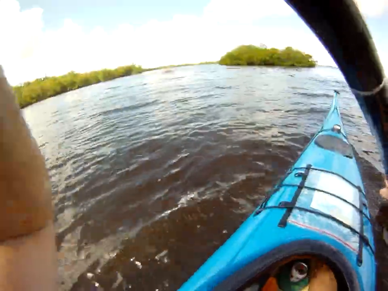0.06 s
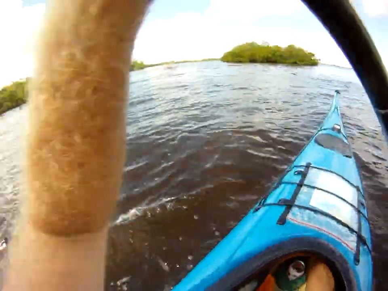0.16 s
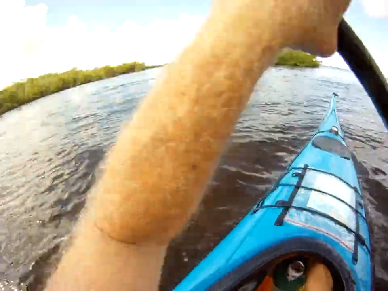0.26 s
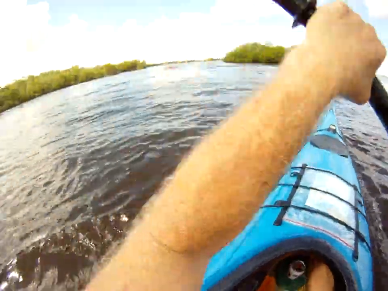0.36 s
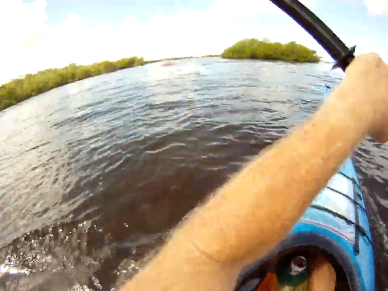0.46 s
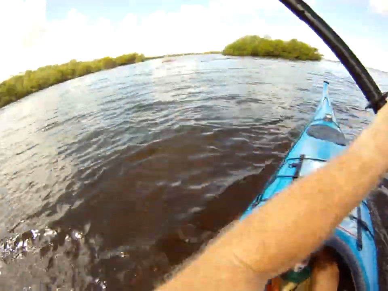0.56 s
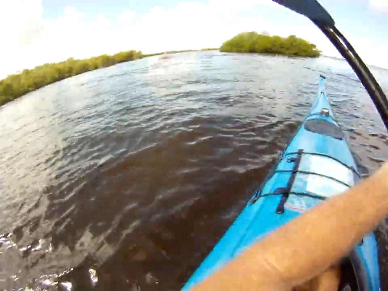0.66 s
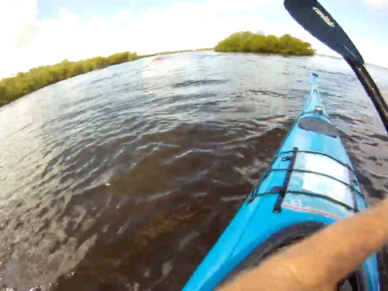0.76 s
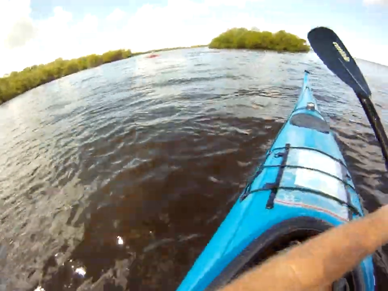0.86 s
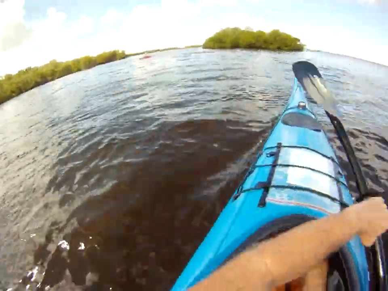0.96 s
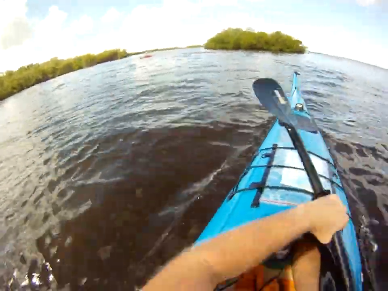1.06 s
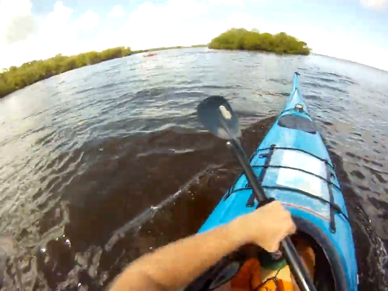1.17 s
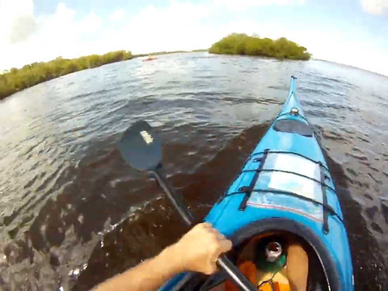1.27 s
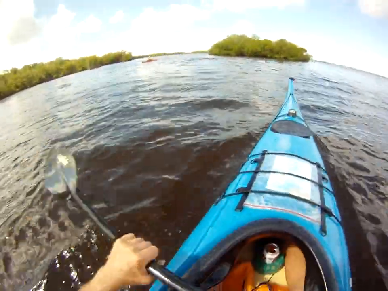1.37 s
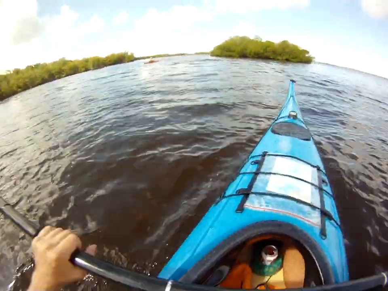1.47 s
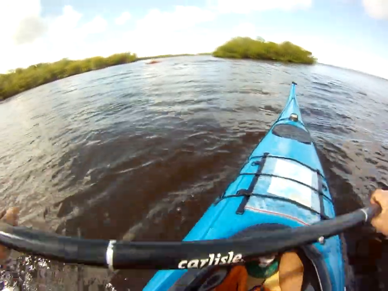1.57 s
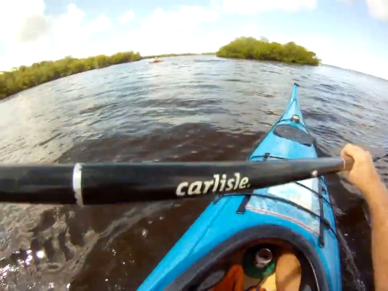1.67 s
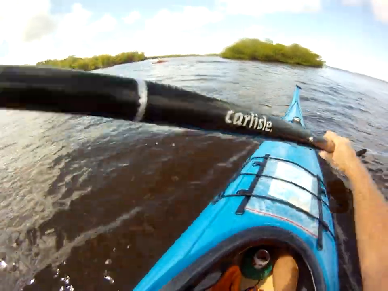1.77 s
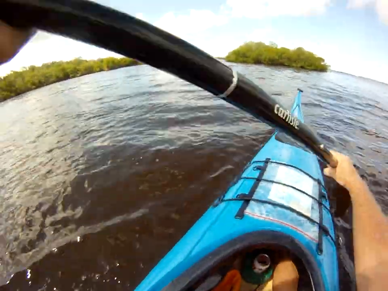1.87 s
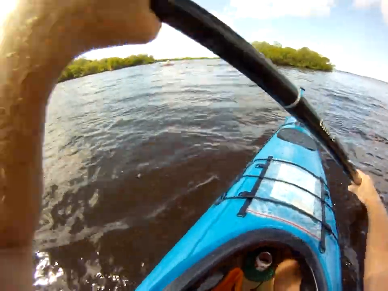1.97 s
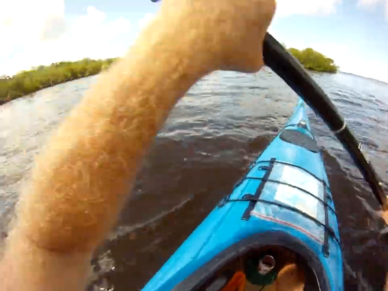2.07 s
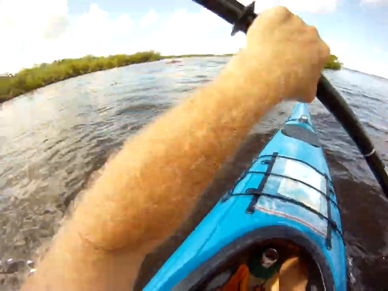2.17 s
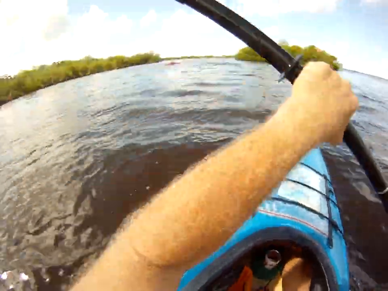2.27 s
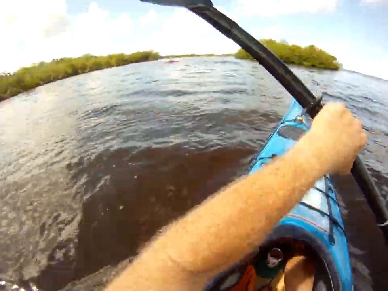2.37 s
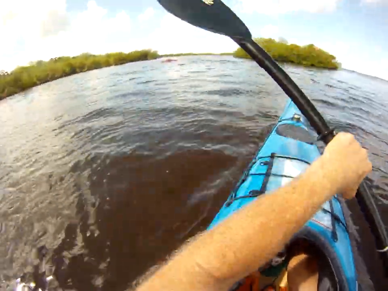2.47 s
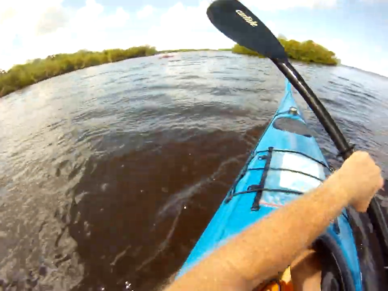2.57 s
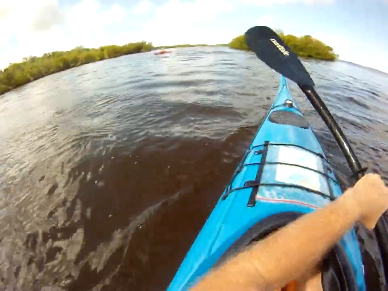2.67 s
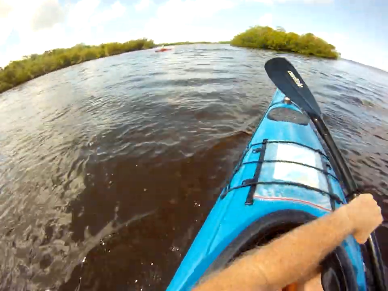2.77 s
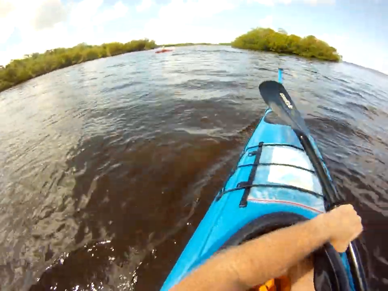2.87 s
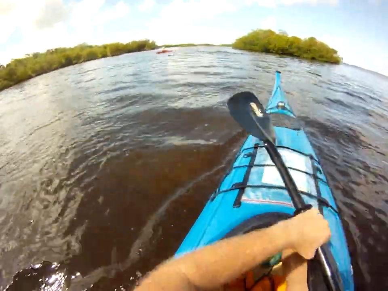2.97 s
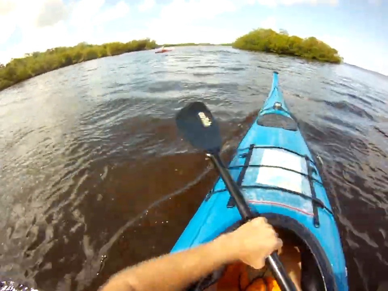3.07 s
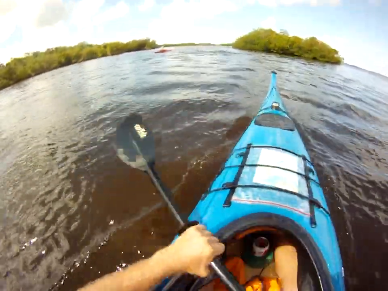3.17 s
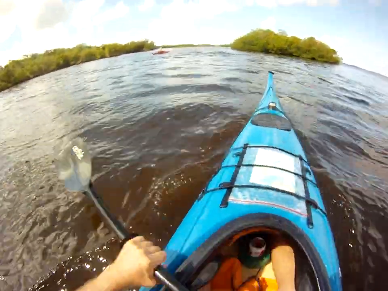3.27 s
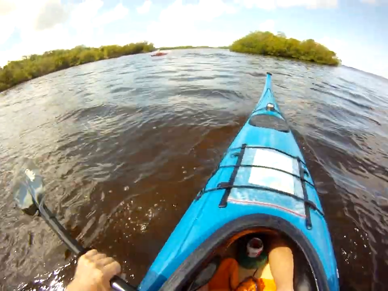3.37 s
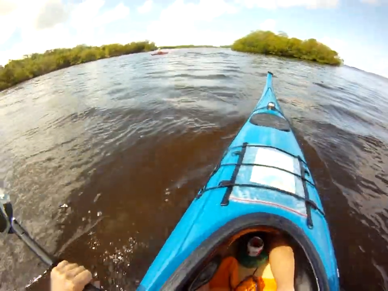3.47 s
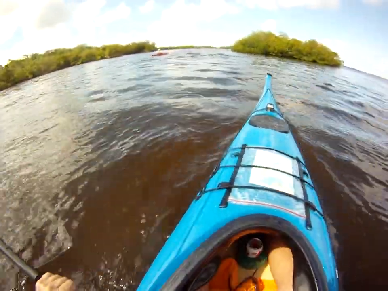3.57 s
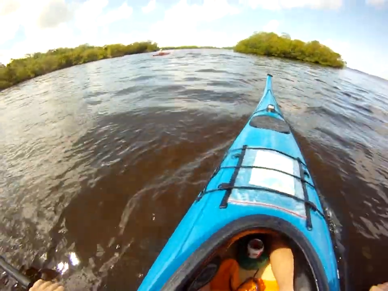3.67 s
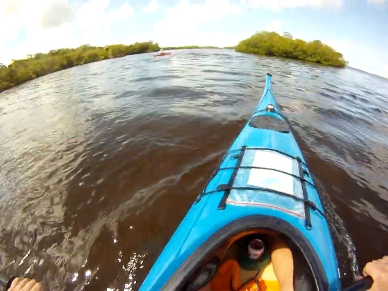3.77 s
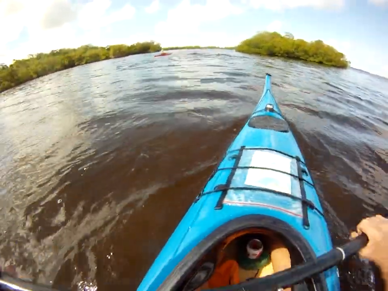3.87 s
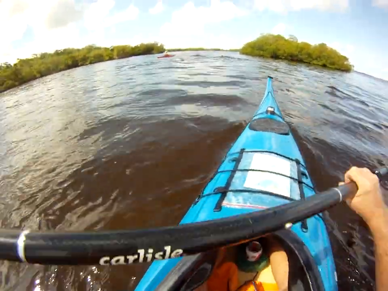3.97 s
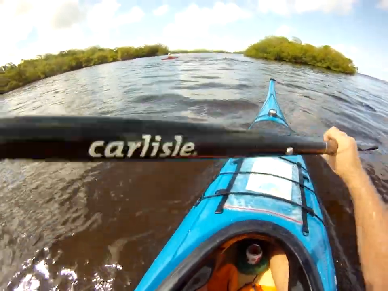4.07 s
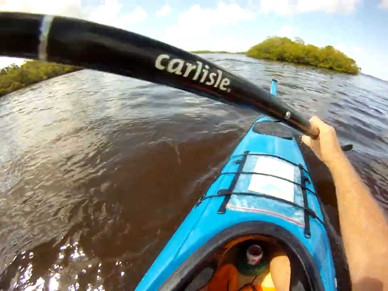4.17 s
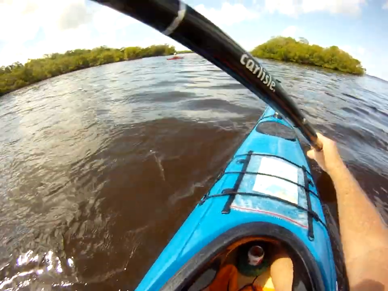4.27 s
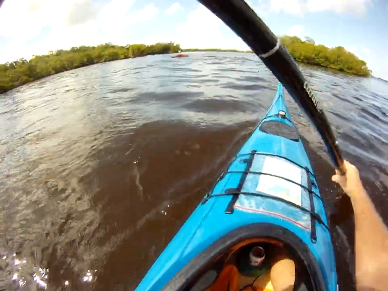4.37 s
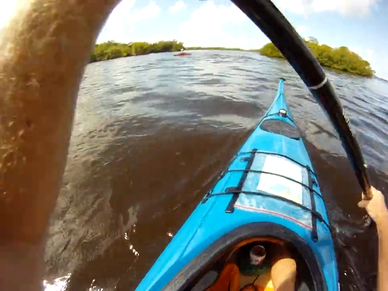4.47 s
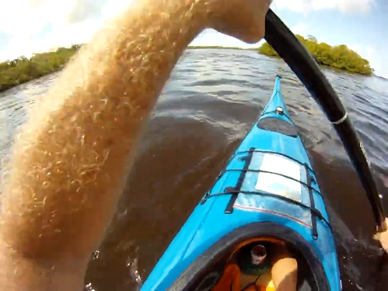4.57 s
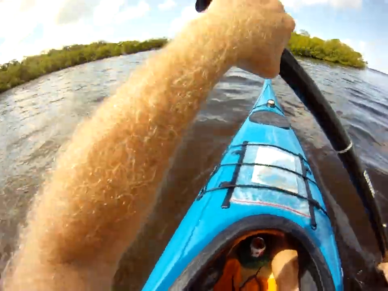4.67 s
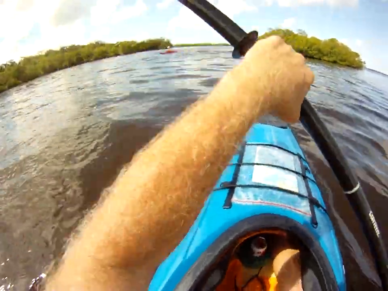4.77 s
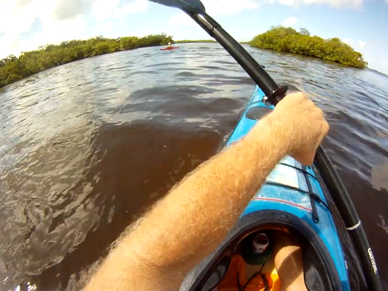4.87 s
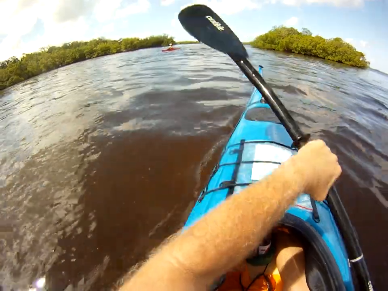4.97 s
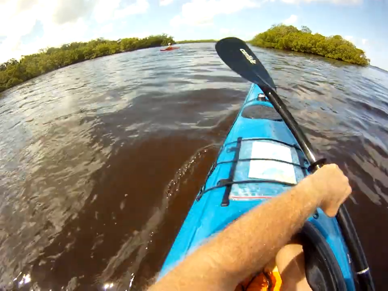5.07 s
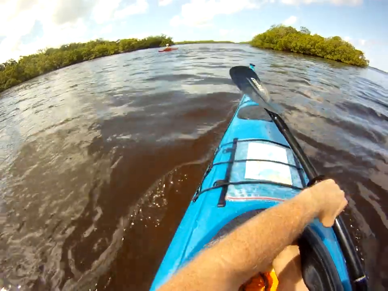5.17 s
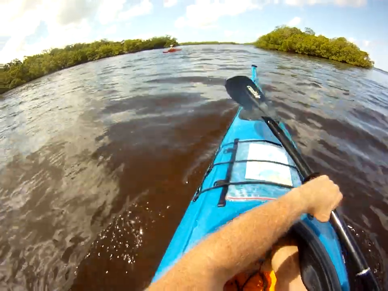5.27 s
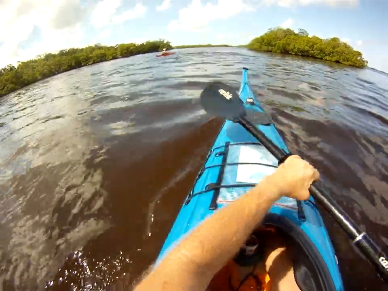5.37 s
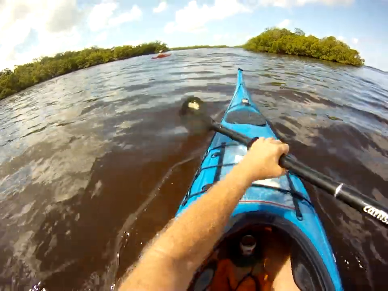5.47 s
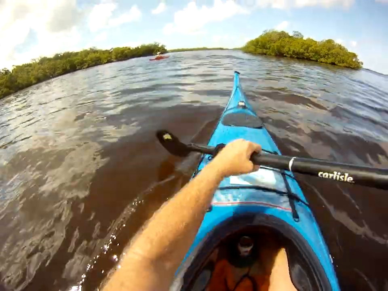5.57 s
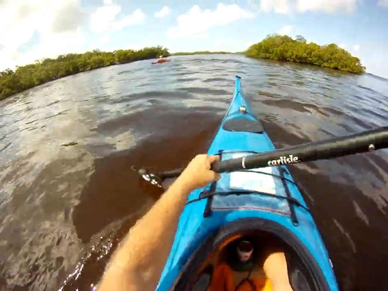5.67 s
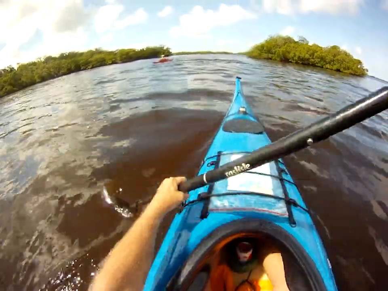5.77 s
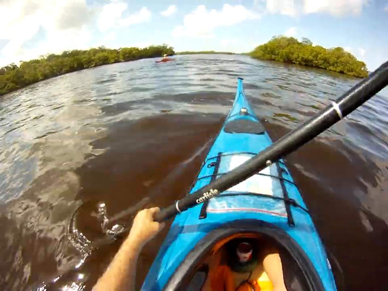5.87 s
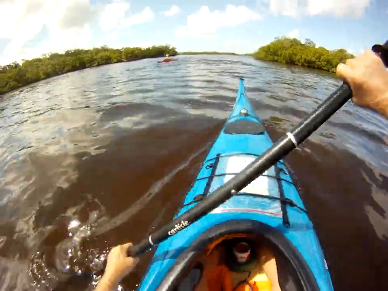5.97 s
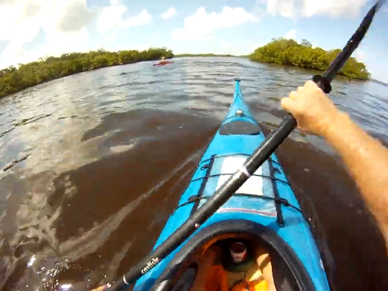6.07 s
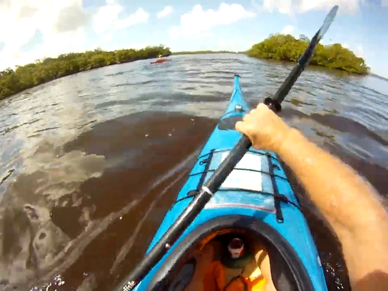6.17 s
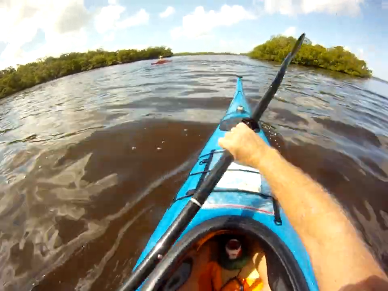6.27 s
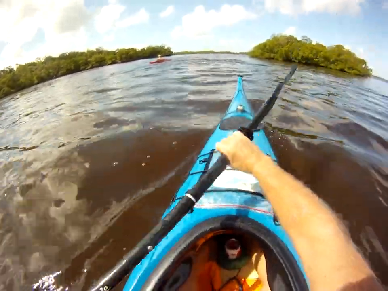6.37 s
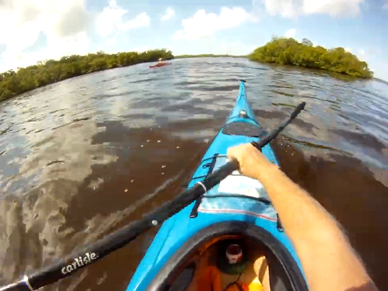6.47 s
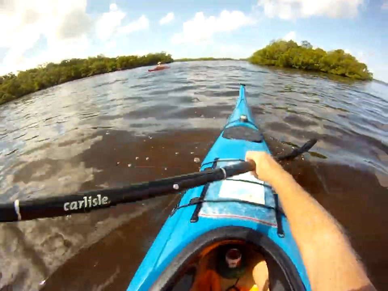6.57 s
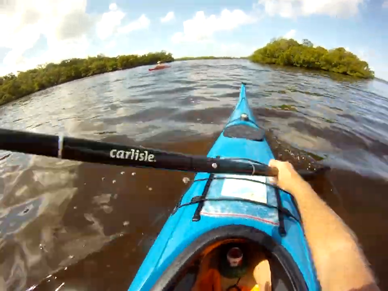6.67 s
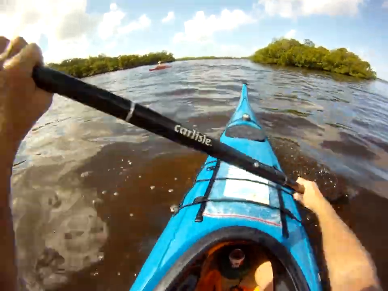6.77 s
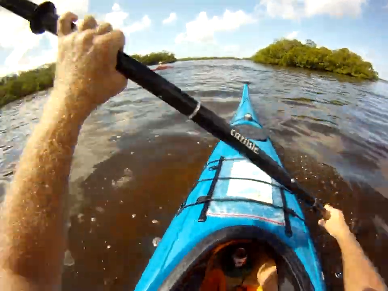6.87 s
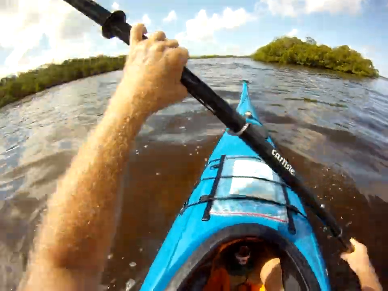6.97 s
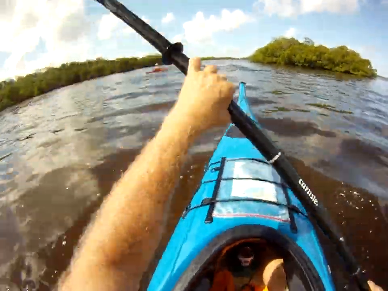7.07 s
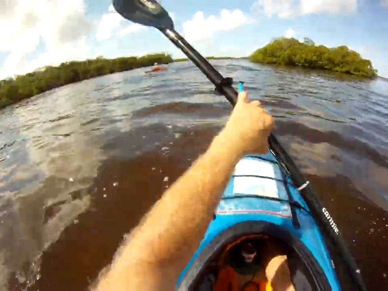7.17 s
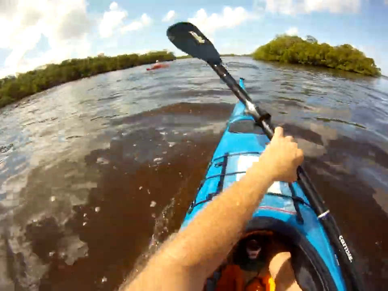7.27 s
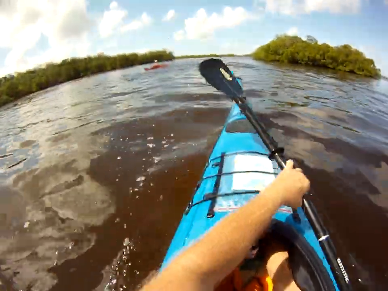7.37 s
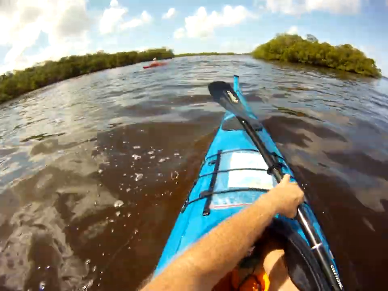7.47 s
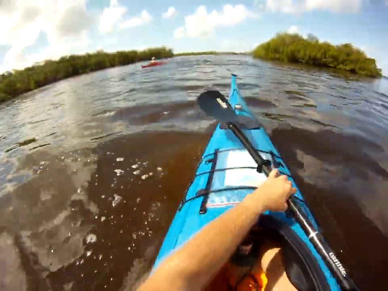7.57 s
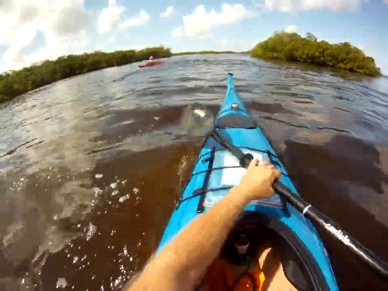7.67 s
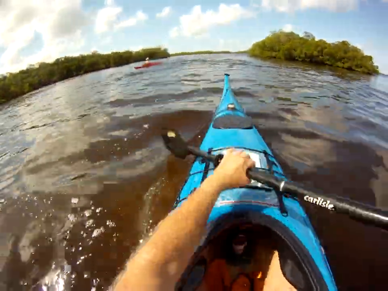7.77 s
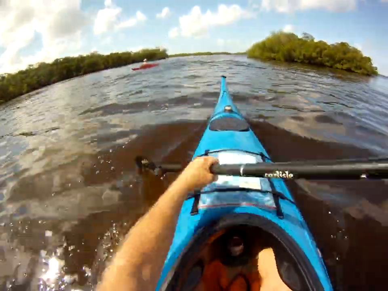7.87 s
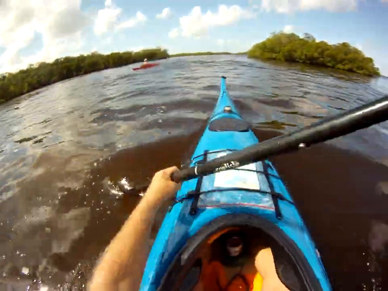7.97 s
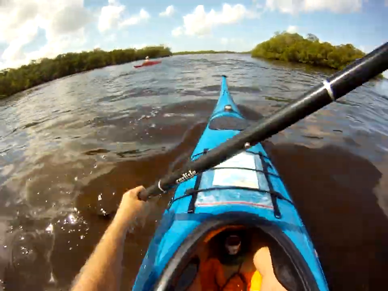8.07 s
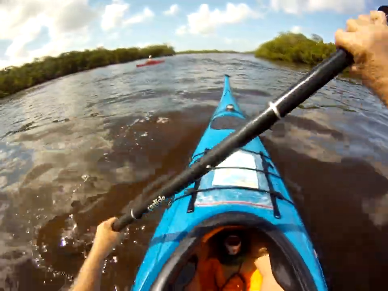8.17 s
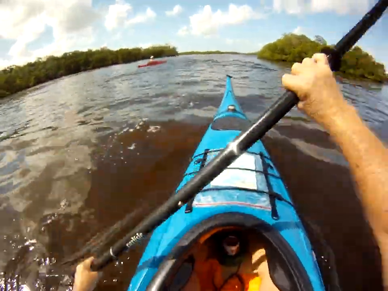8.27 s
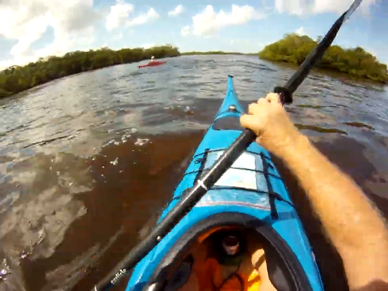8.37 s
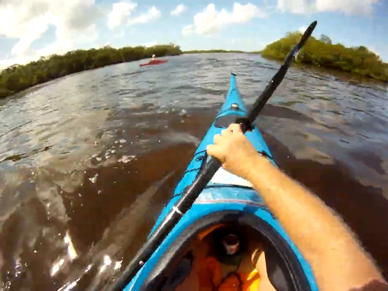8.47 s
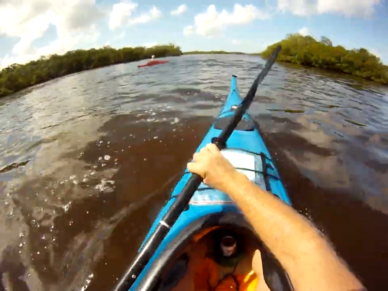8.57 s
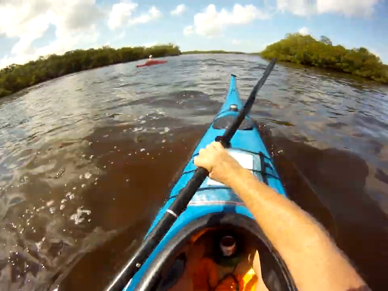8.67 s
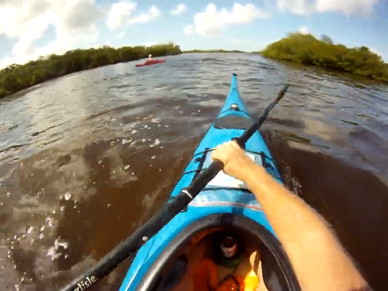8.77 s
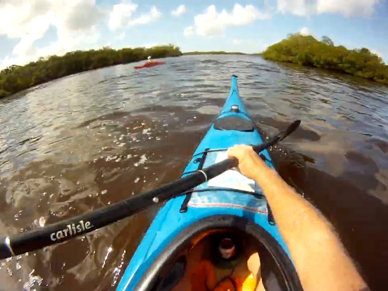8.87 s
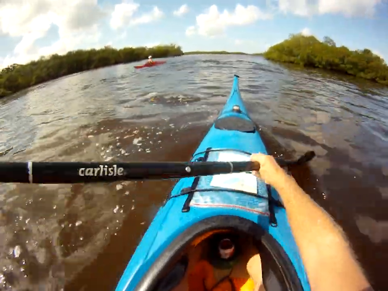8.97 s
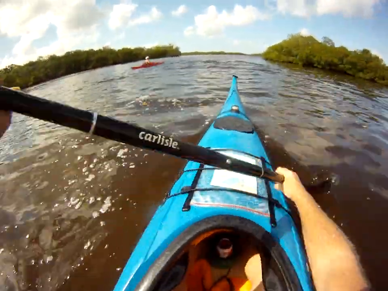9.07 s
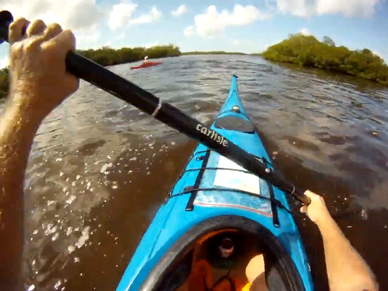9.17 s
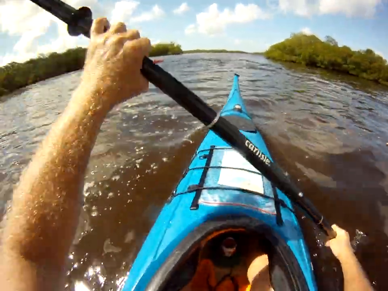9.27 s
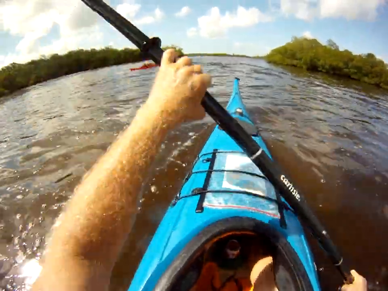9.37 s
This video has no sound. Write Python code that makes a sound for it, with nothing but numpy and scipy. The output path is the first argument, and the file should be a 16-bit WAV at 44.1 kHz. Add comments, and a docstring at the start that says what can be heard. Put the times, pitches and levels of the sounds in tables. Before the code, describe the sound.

A hard knock on the microphone housing, then quiet kayak paddling: watery washes, gurgles, drips and small slaps over low wind rumble and hiss.

```python
"""Kayak paddling on calm water

Wind rumbles as slow-swelling low noise on the small waterproof housing of a mono microphone.
Something knocks the housing hard at the start: short ringing modes, a shove on the capsule, a rattle.
Water washes, gurgles and sprays as noise and ringing bubbles; drips and slapped housing ring as short
gliding sines, slaps are noise bursts and thumps are low pulses. A steady hiss lies under it all.
The recorder samples slowly and holds each value, so everything is mirrored into the treble."""
import sys
import numpy as np
from scipy import signal
from scipy.fft import rfft, irfft, next_fast_len
from scipy.io import wavfile

SR = 44100
rng = np.random.default_rng(int(sys.argv[2]) if len(sys.argv) > 2 else 0)


def int16_out(signal):
    """Quantize to a 16-bit WAV file."""
    q = np.round(np.clip(np.atleast_2d(signal).T, -1, 1) * 32767)
    wavfile.write(sys.argv[1], SR, q.astype(np.int16))


N = 416304


def from_db(db):
    """Decibels to gain."""
    return 10 ** (np.asarray(db) / 20)


def rms_one(x):
    """Scale to rms 1."""
    return x / np.sqrt(np.mean(x ** 2) + 1e-20)


def in_time(rows):
    """Table columns after the first as automation curves, one value a sample."""
    seconds, *columns = np.transpose(rows)
    return [np.interp(np.arange(N) / SR, seconds, column) for column in columns]


def band(x, low_hz, high_hz):
    """Butterworth band-pass."""
    sos = signal.butter(2, [low_hz, high_hz], "band", fs=SR, output="sos")
    return signal.sosfilt(sos, x + 1e-18)


def coloured(spectrum):
    """Noise shaped to a spectrum, straight lines in dB over log frequency; rms 1."""
    hz = np.fft.rfftfreq(N, 1 / SR) + 1
    point_hz, point_db = np.transpose(spectrum)
    gain = from_db(np.interp(np.log(hz), np.log(point_hz), point_db))
    return rms_one(irfft(rfft(rng.standard_normal(N)) * gain, N))


def drift(rate_hz):
    """Slow random wander of spread 1: noise through two equal low-pass poles, one step every 40 samples."""
    r = np.exp(-80 * np.pi * rate_hz / SR)
    steps = rng.standard_normal(N // 40 + 2002)
    slow = signal.lfilter([1], [1, -2 * r, r * r], steps)[2000:]  # drop the filter's start-up
    return np.interp(np.arange(N) / 40, np.arange(len(slow)), rms_one(slow))


def fading(t, rise, t60):
    """A fast rise and an exponential fall, both in seconds."""
    return (1 - np.exp(-t / rise)) * from_db(-60 * t / np.clip(t60, .004, .1))


# resonances of the air and walls of the housing: f/Hz, width/Hz, level/dB
HOUSING_MODES = [(550, 8.4, -18.5), (950, 200, -7), (1574, 150, -9.5), (2090, 190, 2), (2510, 280, -3),
                 (3680, 170, -6), (4740, 290, -16), (5110, 230, -7)]
HOUSING_LEAK_DB = -18


def housing(x):
    """Parallel resonances of the shut box, plus what leaks past them."""
    out = from_db(HOUSING_LEAK_DB) * x
    for k, (hz, width_hz, level_db) in enumerate(HOUSING_MODES):
        r = np.exp(-np.pi * width_hz / SR)
        feedback = [1, -2 * r * np.cos(2 * np.pi * hz / SR), r * r]
        ring = signal.lfilter([(1 - r * r) / 2, 0, (r * r - 1) / 2], feedback, x + 1e-18)
        out = out + (-1) ** k * from_db(level_db) * ring  # neighbours have opposite polarity
    return out


# the blow and its bounce: t/s, dull level/dB, bright level/dB
KNOCK_HITS = [(-.0002, -32, 17.5), (.0048, 0, -14.5)]
# what the struck housing rings with, relative to the hit: f/Hz, level/dB, t60/s
STRUCK_MODES = [(86, -20.5, 0.05), (183, -14, 0.058), (245, -16, 0.064), (295, -13.5, 0.059),
                (360, -18.5, .06), (545, -46, 0.2), (600, -24, 0.072), (794, -14.5, 0.025),
                (1430, -19, .005), (2050, 3, .0045), (2960, 2, 0.0032), (5120, 1, 0.0018)]
# the wall presses the capsule: start t/s, end t/s, level/dB, fade/s, rebound level/dB, rebound fade/s
CAPSULE_SHOVE = (.0014, .0053, 5, .0031, -11, .012)
# loose parts buzz on: t/s, level/dB
RATTLE_LEVEL = [(0, -60), (.005, -23), (.012, -44.5), (.029, -49), (.032, -39.5), (.04, -55.5), (.05, -82),
                (.1, -120)]


def knock():
    """A blow rings the housing, rattles it and shoves the capsule, which springs back."""
    t, out = np.arange(N) / SR, np.zeros(N)
    for s, dull_db, bright_db in KNOCK_HITS:
        age = np.clip(t - s, 0, 1)
        for hz, level_db, t60 in STRUCK_MODES:
            hit_db = dull_db if hz < 1000 else bright_db
            out += from_db(hit_db + level_db - 60 * age / t60) * np.sin(2 * np.pi * hz * age)
    start, end, shove_db, fade, rebound_db, rebound_fade = CAPSULE_SHOVE
    press = np.clip((t - start) / .0003, 0, 1)
    release = np.clip((end - t) / 0.00023 + 1, 0, 1)
    out -= from_db(shove_db) * np.exp(-(t - start) / fade) * press * release
    spring_back = np.clip((t - end) / 0.00066, 0, 1)
    out += from_db(rebound_db) * np.exp(-(t - end) / rebound_fade) * spring_back
    rattle = rms_one(housing(rng.standard_normal(N)))
    return out + from_db(in_time(RATTLE_LEVEL)[0]) * rattle


# wind on the housing, before its random wander: t/s, deep level/dB, upper level/dB
WIND_LEVELS = [(0.1, -47.5, -58.5), (0.41, -46, -67), (1.84, -52.5, -59), (2.21, -43.5, -62.5),
               (2.31, -49.5, -64), (2.83, -42, -57), (2.96, -46, -70), (3.4, -56, -58), (4.99, -43.5, -62),
               (5.46, -49, -62), (5.48, -42, -55.5), (5.72, -50, -63), (6.57, -41, -57.5),
               (6.65, -50.5, -59), (7.02, -42, -55), (7.96, -50.5, -57), (9.31, -46.5, -55.5),
               (9.44, -49.5, -52)]
# colour of the rumble before it is split: f/Hz, relative level per Hz/dB
RUMBLE_SPECTRUM = [(8.8, -25.5), (15, 3), (56, -3.5), (107, -11.5), (151, -12), (233, -23.5), (300, -26),
                   (390, -55.5), (660, -120)]


def wind():
    """Wind pressure on the housing as lumpy low noise in two ranges, each wandering in level."""
    deep_db, upper_db = in_time(WIND_LEVELS)
    deep = rms_one(band(coloured(RUMBLE_SPECTRUM), 14, 90))
    upper = rms_one(band(coloured(RUMBLE_SPECTRUM), 80, 330))
    deep = from_db(deep_db + 0.82 * drift(11)) * deep
    upper = from_db(upper_db + 1.8 * drift(13)) * upper
    return deep + upper


# colour of the hiss: f/Hz, relative level per Hz/dB
HISS_SPECTRUM = [(88, -28), (150, -2), (264, -9), (954, -17), (1270, -17.5), (1840, -20), (2100, -17.5),
                 (2750, -21), (5300, -27.5), (6200, -29), (6890, -50), (11700, -120)]


def hiss():
    """Steady coloured noise under everything."""
    return from_db(-62) * coloured(HISS_SPECTRUM)


# water trickling along the hull, swelling with each pull of the blade: t/s, wash level/dB
TRICKLE_LEVEL = [(.06, -72), (.2, -63), (1.2, -62), (1.5, -71.5), (2.1, -66), (2.2, -63), (3.25, -64.5),
                 (3.35, -68), (4.15, -68), (4.22, -76), (4.53, -71), (4.85, -63.5), (5.3, -60.5),
                 (6.35, -68), (6.8, -64), (7.45, -70.5), (7.8, -62.5), (8.6, -72), (8.8, -64.5),
                 (9.44, -71.5)]
# splashes off the blade: peak t/s, rise/s, fall/s, wash level/dB, gurgle level/dB, spray level/dB
BLADE_SPLASHES = [(.46, 0.041, 0.047, -54, -63, -62), (1.29, 0.09, 0.11, -51, -64, -59.5),
                  (1.4, 0.026, 0.055, -51.5, -70, -59.5), (2.39, 0.16, 0.12, -50.5, -55.5, -55.5),
                  (2.78, 0.16, 0.069, -52, -60, -61.5), (2.86, 0.06, 0.032, -52, -59.5, -60.5),
                  (3.1, .08, .06, -54, -58, -65), (4.595, 0.035, 0.044, -59, -69, -59.5),
                  (4.72, .05, 0.04, -51, -51, -56.5), (4.78, 0.072, 0.017, -46.5, -61, -61.5),
                  (5.05, 0.092, 0.087, -58.5, -63, -63), (5.93, 0.069, 0.067, -53.5, -56, -58),
                  (6.45, 0.022, 0.082, -57, -57, -63), (6.55, 0.067, 0.08, -57, -58.5, -64.5),
                  (6.95, .06, 0.1, -58, -76, -64), (7.61, 0.028, 0.026, -47, -61, -55),
                  (7.73, 0.093, 0.035, -69, -61, -65), (8.12, 0.024, 0.053, -58.5, -70, -60),
                  (8.2, 0.031, 0.042, -65, -64, -59.5), (8.41, 0.062, 0.053, -64.5, -58.5, -63),
                  (8.73, 0.042, 0.11, -58, -54, -59), (9.32, 0.059, 0.057, -59.5, -66, -64)]
# gurgle and spray levels when the wash is at its reference, and their share of its swing
WASH_REFERENCE_DB, GURGLE_DB, SPRAY_DB = -66, -67, -71.5
GURGLE_FOLLOWS, SPRAY_FOLLOWS = 0.68, 0.67
SPLASH_EDGE_DB = 12  # how far a splash lies under its peak one rise before and one fall after


def water_levels():
    """Wash, gurgle and spray in dB: the trickle, with each splash rising out of it and falling back."""
    t = np.arange(N) / SR
    swing = in_time(TRICKLE_LEVEL)[0] - WASH_REFERENCE_DB
    trickle_db = np.array([WASH_REFERENCE_DB + swing,
                           GURGLE_DB + GURGLE_FOLLOWS * swing,
                           SPRAY_DB + SPRAY_FOLLOWS * swing])
    power = from_db(2 * trickle_db)
    for s, rise, fall, *peaks_db in BLADE_SPLASHES:
        near = slice(max(round((s - .5) * SR), 0), round((s + .5) * SR))
        under_db = SPLASH_EDGE_DB * np.maximum((s - t[near]) / rise, (t[near] - s) / fall)
        power[:, near] += from_db(2 * (np.array(peaks_db)[:, None] - under_db))
    return 10 * np.log10(power)


def random_sizes(spread_db):
    """Random strengths with a loud tail and either polarity."""
    return from_db(spread_db * np.minimum(rng.exponential(1, N), 4)) * rng.choice([-1, 1], N)


def bubbles(low_hz, high_hz, per_s, cycles, spread_db, count=14):
    """Random bubbles in surging numbers, each falling 60 dB in some cycles of its pitch; level evened."""
    births = rng.random(N) < per_s * from_db(5 * drift(14)) / SR
    born = random_sizes(spread_db) * births
    dealt, out = rng.integers(0, count, N), np.zeros(N)
    for k, hz in enumerate(np.geomspace(low_hz, high_hz, count)):
        r, w = from_db(-60 * hz / (cycles * SR)), 2 * np.pi * hz / SR
        out += signal.lfilter([0, np.sin(w)], [1, -2 * r * np.cos(w), r * r], born * (dealt == k) + 1e-18)
    return out / np.std(out)


SPATTER_PER_S, SPATTER_DB = 100, -7.5  # landing rate; level against the spray


def spatter(spray_db):
    """Droplets land on deck and blade as bare ticks that the housing colours."""
    landings = rng.random(N) < SPATTER_PER_S / SR
    ticks = band(random_sizes(6.8) * landings, 1200, 6500)
    return from_db(spray_db + SPATTER_DB) * rms_one(housing(ticks))


def water():
    """Gurgle, wash and spray: bubbles of falling size on surging noise, heard through the housing."""
    wash_db, gurgle_db, spray_db = water_levels()
    surge_db = 0.34 * drift(31)  # shared by all three
    out = spatter(spray_db)
    layers = ((gurgle_db, 350, 1800, 400, 18),
              (wash_db, 1800, 3000, 280, 30),
              (spray_db, 3300, 5600, 700, 55))
    for level_db, low_hz, high_hz, per_s, cycles in layers:
        bed = rms_one(band(rng.standard_normal(N), low_hz, high_hz))
        mix = housing(0.4 * bed + 0.8 * bubbles(low_hz, high_hz, per_s, cycles, spread_db=4.0))
        out = out + from_db(level_db + surge_db + 2.0 * drift(35)) * rms_one(mix)
    return out


# bubbles, and the housing ringing under slaps: t/s, level/dB (before rise and fall shape it), starting f/Hz
SHORT_RINGS = [(0.121, -41.5, 516), (.179, -45, 1670), (.18, -39, 2130), (.386, -45, 745),
               (.429, -44, 1140), (0.43, -43.5, 4710), (.455, -38, 2240), (0.47, -38, 4650),
               (.489, -53, 1300), (.598, -44.5, 3640), (0.5988, -39, 2530), (.6475, -37.5, 2200),
               (.656, -41, 2830), (.658, -45, 1150), (.675, -50, 5100), (.902, -47, 950), (.929, -44, 2020),
               (1.015, -48, 930), (1.07, -50, 980), (1.119, -41.5, 2050), (1.19, -40, 2500),
               (1.2546, -35, 2120), (1.2741, -33, 2100), (1.397, -46, 3800), (1.425, -49.5, 950),
               (1.4626, -45, 2080), (1.7235, -43.5, 2090), (1.974, -38.5, 2230), (2.1326, -44, 2080),
               (2.1456, -37, 2130), (2.186, -39, 1650), (2.2798, -41.5, 2200), (2.2808, -46, 3080),
               (2.308, -40, 457), (2.3257, -40.5, 4740), (2.3611, -42, 4670), (2.265, -43.5, 900),
               (2.433, -40.5, 958), (2.485, -44.5, 630), (2.498, -46, 3680), (2.5661, -38.5, 2430),
               (2.577, -47.5, 1000), (2.632, -40, 5110), (2.649, -44, 1560), (2.698, -37.5, 2210),
               (2.821, -38, 2160), (2.8575, -40, 2090), (3.026, -44, 2510), (3.172, -43, 2170),
               (3.23, -40, 2130), (3.2835, -39.5, 2060), (3.52, -38, 2110), (3.649, -35, 2090),
               (3.769, -44, 2530), (3.8154, -47.5, 5200), (4.166, -45.5, 2210), (4.5575, -40, 3370),
               (4.5586, -37.5, 3000), (4.5845, -36, 2110), (4.5945, -38.5, 3600), (4.603, -39, 2200),
               (4.627, -45, 3600), (4.6464, -34.5, 2160), (4.711, -40, 780), (4.768, -45, 1440),
               (4.898, -41, 2440), (4.9163, -47, 3720), (5.032, -39, 2500), (5.056, -37, 2200),
               (5.068, -42, 1160), (5.1887, -35.5, 2300), (5.191, -40, 1650), (5.2366, -41, 2080),
               (5.286, -47, 2040), (5.314, -49, 3690), (5.358, -37.5, 2070), (5.8404, -40, 2220),
               (5.8691, -42, 2680), (5.9065, -41, 2100), (5.92, -31.5, 2200), (5.935, -45, 950),
               (5.965, -47, 700), (6.0008, -41.5, 5120), (6.428, -45, 1090), (6.4588, -38.5, 2980),
               (6.4678, -40, 2090), (6.5221, -38, 2130), (6.79, -42, 2110), (6.9265, -45.5, 5100),
               (7.2041, -47, 2100), (7.246, -29.5, 2200), (7.5009, -41.5, 2220), (7.5944, -39, 2510),
               (7.601, -43, 398), (7.6032, -37, 3680), (7.6047, -30.5, 2510), (7.679, -44, 1090),
               (7.6985, -37, 2400), (7.717, -41, 1520), (7.739, -43, 385), (7.7412, -35.5, 2540),
               (7.8, -40, 1560), (8.108, -44, 3800), (8.1365, -44, 2870), (8.1864, -41, 3540),
               (8.192, -40, 1930), (8.362, -44.5, 1430), (8.565, -46.5, 950), (8.7072, -34.5, 2560),
               (8.7192, -44, 5030), (8.7261, -33.5, 5040), (8.7274, -33, 2880), (8.726, -27.5, 2124),
               (8.726, -28.5, 567), (9.209, -46, 2580), (9.371, -45, 2120)]
RING_T60_S, RING_HZ, SHORTER_POWER = 0.023, 2200, 0.44  # ring time at that pitch; higher rings are shorter
RING_RISE_CYCLES = 1.78


def short_rings():
    """Each ring is a short sine gliding up a little, with a fast rise and an exponential fall."""
    out, t = np.zeros(N + SR), np.arange(round(.12 * SR)) / SR
    for s, level_db, hz in SHORT_RINGS:
        t60 = RING_T60_S * (RING_HZ / hz) ** SHORTER_POWER
        envelope = from_db(level_db) * fading(t, RING_RISE_CYCLES / hz, t60)
        i = round(s * SR)
        out[i:i + len(t)] += envelope * np.sin(2 * np.pi * hz * t * (1 + 0.5 * t))
    return out[:N]


# slaps of water on blade and hull: t/s, dull peak level/dB, bright peak level/dB
WATER_SLAPS = [(0.179, -38, -62), (0.456, -48, -50), (0.597, -56, -40), (.609, -63, -44),
               (2.188, -33.5, -53), (2.204, -38, -60), (2.632, -59, -44), (4.557, -46, -44),
               (4.585, -47, -57), (5.92, -42, -54), (6.434, -41.5, -48), (6.458, -47, -50),
               (7.203, -40.5, -60), (7.59, -47, -44), (7.604, -37, -43), (7.74, -40, -56),
               (8.109, -50, -41.5), (8.187, -47, -47), (8.427, -49, -43), (8.719, -41, -51),
               (8.728, -31.5, -33), (8.745, -49, -42)]
SLAP_RISE_S, SLAP_T60_S = .0006, 0.009


def slaps():
    """Each slap: a dull and a bright burst of noise, dying together; the housing colours the bright one."""
    out, t = np.zeros(N + SR), np.arange(round(.05 * SR)) / SR
    envelope = fading(t, SLAP_RISE_S, SLAP_T60_S)
    for s, dull_db, bright_db in WATER_SLAPS:
        dull, bright = rng.standard_normal((2, len(t))) * envelope
        dull = band(band(dull, 680, 2250), 520, 3000)
        bright = housing(band(bright, 2470, 7700))
        i = round(s * SR)
        out[i:i + len(t)] += from_db(dull_db) * dull / np.abs(dull).max()
        out[i:i + len(t)] += from_db(bright_db) * bright / np.abs(bright).max()
    return out[:N]


# water thumps the hull: t/s, peak level/dB
HULL_THUMPS = [(2.378, -43), (2.4, -40), (5.932, -43), (7.604, -44), (7.74, -43.5), (8.385, -45)]


def thumps():
    """Each thump is a bare low pulse, the response of a band-pass to one click."""
    clicks = np.zeros(N)
    for s, peak_db in HULL_THUMPS:
        clicks[round(s * SR)] = from_db(peak_db)
    pulse = band(np.eye(1, 2000)[0], 180, 1000)
    return signal.fftconvolve(clicks, pulse / np.abs(pulse).max())[:N]


SIDE_DB, FULL_BAND_SIDE_DB = -19.5, -38


def scene():
    """One microphone feeds both channels, which differ only by a faint waver, fainter in the bass."""
    blow = knock()
    wet = wind() + hiss() + water() + short_rings() + slaps() + thumps()
    waver = from_db(SIDE_DB) * drift(60) * band(wet + from_db(-15) * blow, 400, 9000)
    waver += from_db(FULL_BAND_SIDE_DB) * drift(8) * wet
    return wet + blow + waver * [[1], [-1]]  # opposite polarity left and right


HOLD_HZ = 12000  # the recorder's sampling rate
CUTOFF_HZ = 15250


def record(dry):
    """Guard filter, overload, slow sampling with held values, final cut."""
    guard = signal.cheby1(5, 1, 5450, fs=SR, output="sos")
    x = np.clip(signal.sosfilt(guard, dry), -1, 1)
    # sampling mirrors the spectrum round the rate
    mirrored = x * (1 + 2 * np.cos(2 * np.pi * HOLD_HZ * np.arange(N) / SR))
    # holding weights it by sin(x)/x
    size = next_fast_len(N + 4096)
    hold_gain = np.sinc(np.fft.rfftfreq(size, 1 / SR) / HOLD_HZ)
    held = irfft(rfft(mirrored, size) * hold_gain, size)[:, :N]
    final_cut = signal.cheby2(16, 40, CUTOFF_HZ + 250, fs=SR, output="sos")
    return np.clip(signal.sosfilt(final_cut, held), -1, 1)


dry = scene()
out = record(dry)
int16_out(out)
```